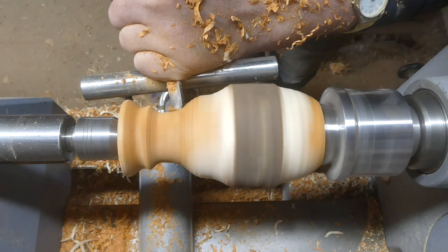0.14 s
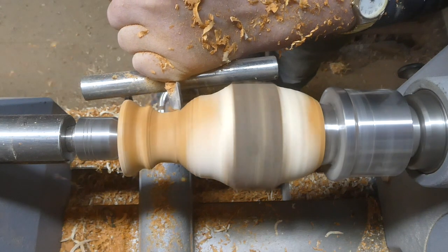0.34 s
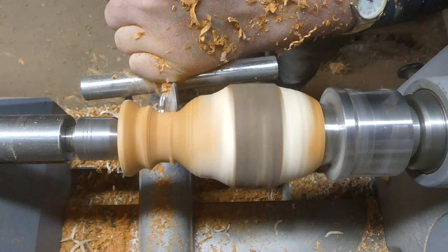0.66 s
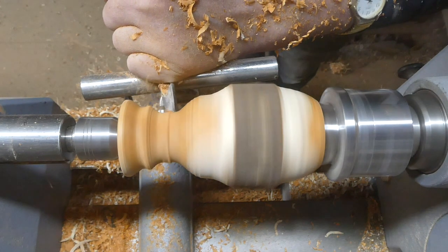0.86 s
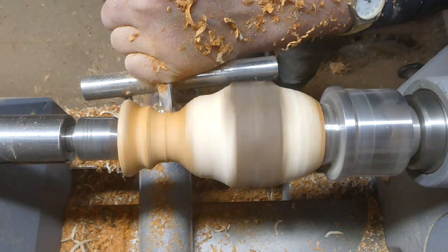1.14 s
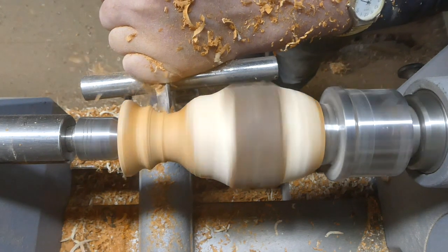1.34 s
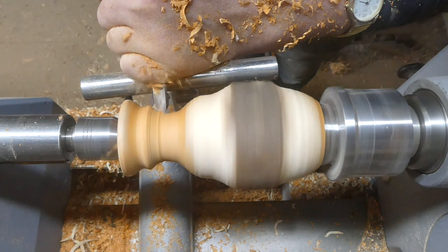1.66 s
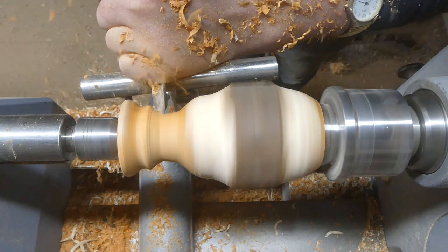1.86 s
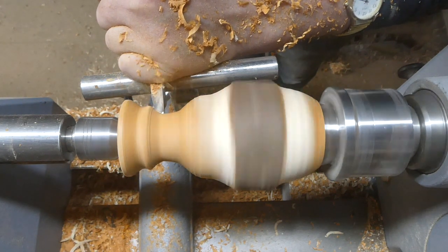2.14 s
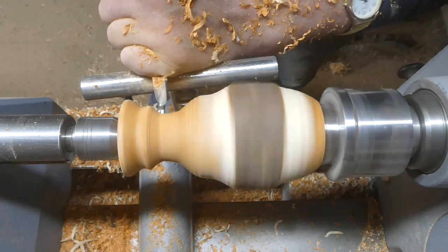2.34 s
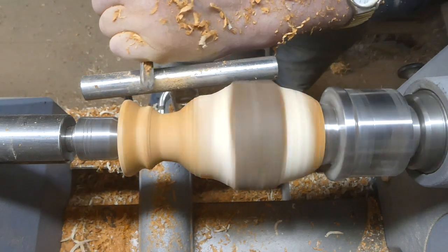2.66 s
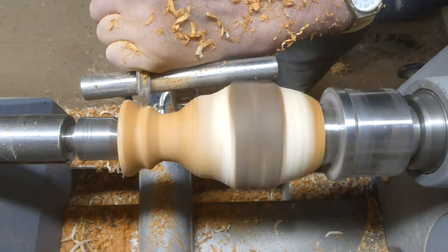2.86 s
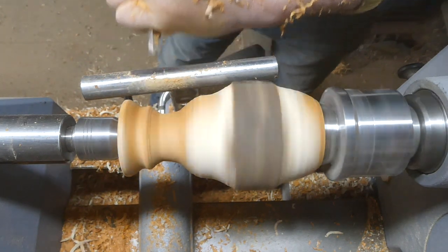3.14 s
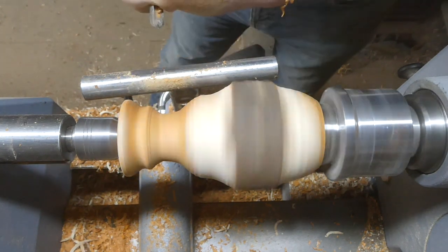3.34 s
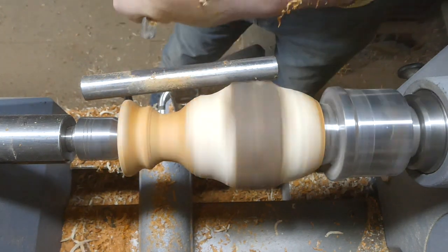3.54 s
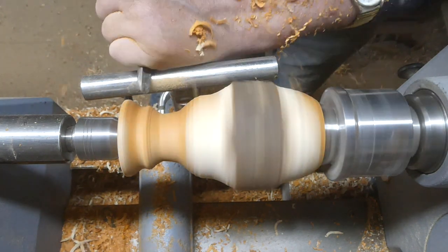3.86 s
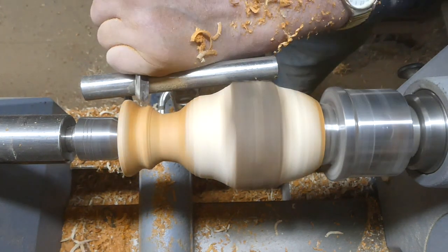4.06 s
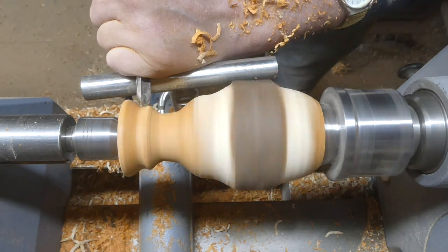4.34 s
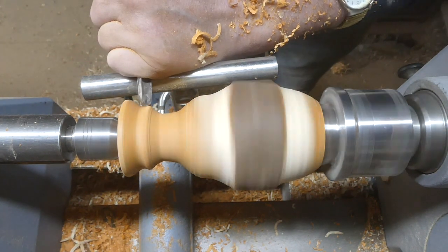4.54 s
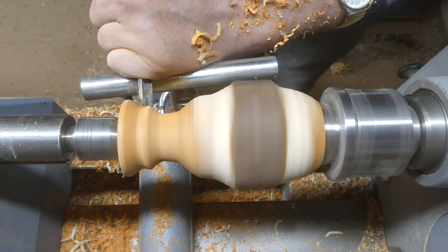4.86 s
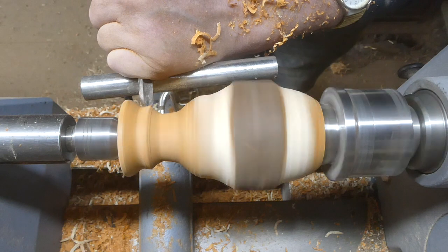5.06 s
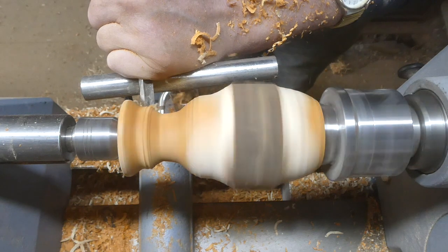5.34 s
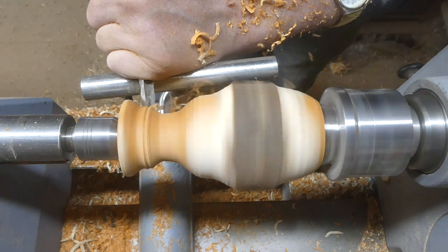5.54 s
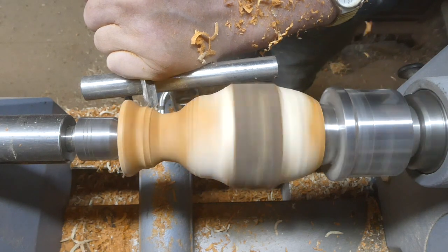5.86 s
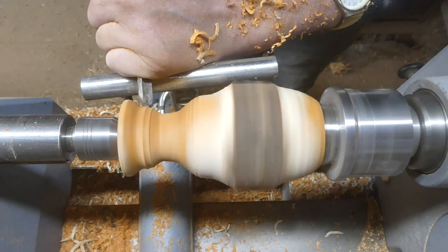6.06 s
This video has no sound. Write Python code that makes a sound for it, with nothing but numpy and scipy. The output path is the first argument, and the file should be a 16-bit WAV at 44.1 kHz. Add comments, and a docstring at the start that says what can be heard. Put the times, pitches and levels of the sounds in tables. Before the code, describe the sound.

A gouge scrapes spinning wood in a loud, crackling, fluttering rush, pauses over a humming lathe with small metal clicks, then cuts again briefly.

```python
"""Gouge on a lathe

A gouge cuts a wooden vase in two close passes; tearing fibres excite wood and tool, pulsing with the grain.
Chips snap, the rubbing bevel sings, and a thin squeal rides on the first pass.
Filtered noise makes the lathe's drone and hiss, sines the motor and its whine; room tails widen the sound.
Between passes shavings are brushed off the hand and the tool clicks on its rest: shaped and ringing noise.
"""
import sys
import numpy as np
from scipy import signal
from scipy.fft import rfft, irfft
from scipy.io import wavfile
from scipy.ndimage import uniform_filter1d

SR = 44100
rng = np.random.default_rng(int(sys.argv[2]) if len(sys.argv) > 2 else 0)


def persist_wave(psi):
    """Save psi, clipped to +-1, as 16-bit WAV."""
    counts = np.round(np.clip(psi, -1, 1) * 32767).astype(np.int16)
    wavfile.write(sys.argv[1], SR, np.atleast_2d(counts).T)


N = 273420
TIME = np.arange(N) / SR
HZ = np.fft.rfftfreq(8192, 1 / SR)

TURNS_PER_S = 15.4
DEEPEN_DB_PER_S = 2.0  # the lows gain on the rest as the gouge sinks in
SNAP_CHANCE, SNAP_S, SNAP_JITTER_S = 0.8, 0.0015, 0.014  # small chips at the hard spots
SNAP_MAX_OVER_FORCE_DB, SNAP_SPREAD_DB = 13.5, 6.5
DIP_FALL_S, DIP_RETURN_DB_PER_S = 0.18, 5
SQUEAL_HZ, SWITCH_HZ, MOTOR_HZ = 1143, 10000, 31.67
SAG_SHARE, FULL_FORCE_DB = 0.025, -43  # motor slowing at full cutting force
EDGE_HZ = 15850

# the two passes: (time [s], cutting force [dB], treble level [dB], top fizz level [dB])
FIRST_PASS = [(0, -50, -41, -43.5), (0.19, -48.5, -40, -48.5), (0.3, -51.5, -46, -53),
              (0.37, -45, -44, -51.5), (0.5, -43, -42, -50.5), (0.9, -43, -44.5, -48.5),
              (1.15, -42.5, -43.5, -47), (1.66, -43.5, -45, -48), (2.1, -56, -52, -49),
              (2.19, -70.5, -72, -65)]
SECOND_PASS = [(4.58, -67, -54, -71), (4.62, -55.5, -51.5, -57), (4.815, -57, -58, -55),
               (4.836, -44, -43, -45.5), (5.08, -45.5, -46.5, -47.5), (5.35, -43.5, -41.5, -45.5),
               (5.64, -47.5, -39.5, -46.5), (5.71, -47, -44, -46.5), (5.78, -52.5, -47.5, -51.5),
               (5.83, -53.5, -59, -52), (5.88, -69, -76, -63)]
# hard spots of the grain: (place [turns], half-width to 1/e [turns], hardness [dB])
FIRST_GRAIN = [(.33, 0.19, 3), (0.569, 0.15, 2.5), (.8, 0.1, 3.5)]
SECOND_GRAIN = [(0.101, 0.2, 2.1), (.44, 0.15, 4.8), (.9, 0.059, 5.5)]
# broad colour of the cutting: (frequency [Hz], first pass [dB], second pass [dB])
WOOD_COLOUR = [(120, -33, -25), (190, -22, -12), (256, -13.5, -12), (577, -3.5, -5.5), (975, -5, -3.5),
               (1600, -9, -21.5), (2510, -10, -26), (3300, -16.5, -19), (5000, -1.5, -10.5),
               (7300, -12, -3.5), (8900, -11, 1.5), (11730, -18, -11), (14300, -23, -13), (15500, -17, -18)]
# workpiece, gouge and rest resonances: (frequency [Hz], width [Hz], first height [dB], second height [dB])
CUTTING_MODES = [(259, 58, 13.5, 18.5), (374.5, 28, 8, 15.5), (473, 190, 6, 10.5), (628, 38, 5, 11),
                 (744, 57, 4, 7), (784.7, 42, 12.5, 14), (953, 16, 8.5, 8), (1067, 21, 4, 13),
                 (1160, 18, 7.5, 13), (1281, 70, 12, 10), (1421, 117, 13, 14), (1504, 23, 15, 12.5),
                 (1587, 40, -1.5, 16), (1795, 480, 16.5, 15.5), (2097, 860, 1, 18), (2493, 42, 10, 11),
                 (2722, 300, 11.5, 10.5), (3032, 96, 13.5, 7), (3243, 74, 11, 17.5),
                 (3527, 570, 12.5, 17.5), (3832, 36, 7.5, 14.5), (4604, 810, 5, 17), (5390, 120, -5.5, 5),
                 (9470, 210, 9, -1), (10470, 1500, 4.5, 7), (15200, 1065, -5.5, 5)]
# the gouge's ring when a chip snaps: (frequency [Hz], width [Hz], first height [dB], second height [dB])
GOUGE_MODES = [(1990, 380, -6, 9), (2520, 77, -4, -20), (3370, 230, -2, 8.5), (5100, 850, 8, -5)]
# the edge catches and snaps off a big chip: (time [s], peak [dB], length [s])
BIG_CATCHES = [(0.144, -28, 0.0027), (0.196, -26, 0.0027), (0.2015, -20, 0.0025), (0.212, -23, 0.0019),
               (0.22, -24, 0.0032), (0.2302, -24, 0.0011), (0.251, -21, 0.0022), (0.263, -22.5, 0.0066),
               (0.284, -26, 0.0033), (0.329, -28, 0.0017), (0.3365, -32, .002), (0.343, -26.5, 0.004),
               (0.349, -26, 0.0011), (0.372, -27, 0.0025), (0.408, -27.5, 0.0034), (0.437, -36, 0.0027),
               (0.472, -26.5, 0.0027), (0.487, -28.5, .0025), (0.504, -26, 0.0034), (0.533, -25, 0.00091),
               (0.539, -20.5, 0.0043), (0.569, -27, .003), (0.6015, -24.5, 0.0037), (0.605, -24, 0.0029),
               (0.6645, -22.5, 0.0036), (0.683, -34, .0015), (0.697, -26, 0.0033), (0.7265, -25, 0.003),
               (0.732, -22.5, 0.0035), (0.7917, -24, 0.0011), (0.802, -30, 0.0012), (0.864, -31, 0.0016),
               (0.956, -28.5, 0.0017), (0.994, -33, 0.0017), (1.008, -22.5, 0.0014), (1.0595, -23, 0.00099),
               (1.079, -23.5, 0.004), (1.092, -21.5, 0.00058), (1.14, -27, .0015), (1.189, -26, 0.0032),
               (1.218, -28.5, 0.0022), (1.312, -26.5, 0.0014), (1.3195, -32, 0.0008), (1.349, -26, 0.0032),
               (1.383, -29, 0.0018), (1.3975, -25, 0.00067), (1.422, -27, 0.001), (1.4505, -25, 0.0021),
               (1.468, -32, .0015), (1.542, -28, .003), (1.638, -34, 0.0016), (1.709, -27, .0015),
               (1.722, -24, 0.0056), (1.74, -26.5, 0.00099), (1.776, -25, 0.0013), (4.834, -30, .002),
               (4.86, -18, 0.0023), (4.876, -26, .004), (4.8915, -24.5, 0.0061), (4.926, -22.5, 0.0038),
               (4.96, -31, 0.0057), (4.993, -29, 0.0072), (5.0558, -25, 0.0015), (5.119, -23.5, 0.0043),
               (5.152, -32, 0.0037), (5.1855, -28.5, 0.004), (5.221, -35, 0.0064), (5.247, -26, 0.0033),
               (5.315, -28.5, 0.0024), (5.354, -27.5, 0.0027), (5.483, -28, 0.0022), (5.557, -30, 0.0017),
               (5.639, -26.5, 0.0021)]
# the rubbing bevel feeds one resonance: (start [s], end [s], frequency [Hz], width [Hz], level [dB])
SINGING_BURSTS = [(0.0223, 0.072, 2700, 110, -39), (0.1, 0.18, 2750, 150, -44),
                  (0.163, 0.243, 2700, 220, -40), (0.23, 0.292, 2560, 200, -40),
                  (0.318, 0.37, 2610, 150, -41), (0.398, 0.436, 2740, 78, -41.5),
                  (0.45, 0.56, 2700, 140, -48), (0.008, 0.092, 4960, 420, -37.5),
                  (0.097, 0.315, 5070, 510, -40.5), (0.015, 0.23, 1660, 200, -54),
                  (0.224, 0.337, 1500, 170, -43), (0.15, 0.24, 1700, 800, -44), (.46, .56, 1780, 290, -43),
                  (.49, 0.51, 370, 240, -43), (.01, 0.71, 265, 26, -57), (0.418, 0.81, 1380, 250, -45.5),
                  (0.29, 1.15, 4900, 470, -52.5), (1.15, 1.85, 5010, 370, -50.5),
                  (0.92, 0.985, 800, 72, -45), (1.5, 1.72, 420, 94, -51.5), (1.85, 2.14, 9000, 460, -59),
                  (4.59, 4.675, 1540, 160, -46), (4.675, 4.85, 1540, 150, -49.5),
                  (4.59, 4.78, 3200, 200, -55), (4.81, 5.72, 3365, 190, -49), (4.86, 5.05, 770, 59, -45),
                  (5.1, 5.5, 763, 99, -51), (5.44, 5.73, 3440, 600, -43.5)]
# thin squeal of the first pass: (time [s], level [dB])
SQUEAL_LEVEL = [(0.35, -72), (0.372, -50.5), (0.61, -53.5), (0.635, -50), (0.74, -46), (0.99, -54),
                (1.04, -72)]
# tool touching the rest: (time [s], rms over the first 10 ms of the crack [dB], brightest band [Hz],
# its width [Hz], its height [dB], top edge [Hz], steel ring re crack [dB], knock of the rest [dB])
TOOL_CLICKS = [(3.002, -54, 6840, 1800, 7, 7500, -14, -44.5), (3.2366, -41, 6900, 1700, 12, 7500, -17, -42),
               (3.6244, -42, 3430, 1200, 14, 6500, -19, -42), (3.86, -33, 3750, 1700, 14, 9500, 2.5, -45)]
# broad tool rest resonances: (frequency [Hz], width [Hz], height [dB])
REST_MODES = [(1700, 480, 7.5), (2680, 340, -11), (3180, 290, 12.5), (4450, 450, 8), (5240, 430, -5),
              (6200, 510, 8), (8650, 1700, 5)]
# thin ring of the steel: (frequency [Hz], relative level [dB], t60 [s])
STEEL_RING = [(3300, -12, 0.14), (4430, -14, .03), (6400, -17.5, .04), (9790, -4.5, 0.12), (11400, -6, .05)]
# knock of the rest and its post: (frequency [Hz], relative level [dB], t60 [s])
REST_KNOCK = [(275, -7.5, .08), (1600, -3.5, 0.053), (1880, -13, 0.037), (2370, -6, .03)]
# shavings brushed off the hand: (time [s], level [dB])
BRUSHING_LEVEL = [(2.8, -66), (3.15, -60), (3.3, -58), (3.42, -54.5), (3.48, -55.5), (3.53, -50),
                  (3.65, -49.5), (3.73, -56), (3.83, -54), (3.95, -65)]
# colour of the shavings: (frequency [Hz], relative level [dB])
SHAVINGS_COLOUR = [(300, -57), (950, 9.5), (1400, 27), (1900, 20), (2500, 18), (3300, 17.5), (7000, 7.5),
                   (10000, -1), (15000, -1)]
# colour of the running lathe: (frequency [Hz], relative level [dB])
LATHE_COLOUR = [(120, 2.5), (200, -9), (270, 4), (420, -5), (700, -12.5), (1400, -7), (2500, -6.5),
                (4000, -14), (7000, -15.5), (9500, -21), (12000, -24), (15500, -29.5)]
# headstock resonances: (frequency [Hz], width [Hz], height [dB])
HOUSING_MODES = [(297, 9.3, 3.5), (364, 50, 3.5), (480, 45, 4.5), (572, 110, 3), (752, 140, 6),
                 (1071, 37, 8.5), (1194, 18, 9), (1314, 58, 12), (1530, 170, 4.5), (2033, 23, 12),
                 (2916, 59, 8), (3140, 120, 10.5), (4000, 430, 6), (9970, 2000, 14)]
# set times when the running noise is heard more faintly: (start [s], end [s], depth [dB])
RUNNING_NOISE_DIPS = [(.17, 2.22, 9.5), (3.75, 4.18, 1), (5.099, 5.7, 3)]
# motor tones: (unloaded frequency [Hz], relative level [dB])
MOTOR_TONES = [(338, -57.3), (506.0, -70), (555, -70), (570.6, -61.5), (1071, -67), (1200, -73),
               (1298, -70), (1314, -68), (1384, -71), (1577, -71), (2030, -75)]
# sidebands of the drive's switching tone: (offset [multiples of MOTOR_HZ], relative level [dB])
WHINE_SIDEBANDS = [(-21, -79), (-15, -77), (-13, -78), (-5, -69.5), (-3, -65), (-1, -66.5), (1, -73),
                   (3, -70), (5, -71), (15, -71), (17, -80), (21, -81)]
# mains hum: (frequency [Hz], level [dB])
MAINS_HUM = [(49.7, -74), (99.8, -69.5)]
# colour of the workshop rumble: (frequency [Hz], relative level [dB])
RUMBLE_COLOUR = [(12, -2), (25, -13), (42, 8), (60, 3.5), (80, -0.5), (130, -3), (200, 3), (500, -59)]
# diffuse room tail: (frequency [Hz], relative level [dB], t60 [s])
ROOM_TAIL = [(50, -3.5, 0.52), (130, -29, 0.098), (300, -10, 0.2), (795, -9.5, 0.17), (4900, -12.5, 0.072),
             (8040, -11, 0.073), (15000, -3.5, 0.13)]


def cut(rows, grain, body_db, depth_db, grain_low=0.23, grain_high=0.76, grain_chips=0.98,
        flutter_db=0.5, unsteady_db=1.0, crackle_db=-4):
    """One pass: fibres tear harder in hard grain and ring wood and tool; the lows grow with depth."""
    force_db, treble_db, fizz_db = curves(rows)
    start_s, end_s = rows[0][0], rows[-1][0]
    lows_db = force_db + depth_db + DEEPEN_DB_PER_S * np.clip(TIME - start_s, 0, end_s - start_s)
    touching = uniform_filter1d(1. * ((TIME >= start_s) & (TIME <= end_s)), size=400)
    hand = gain_of(unsteady_db * wander(18.5))  # uneven feed
    flutter = flutter_db * wander(100)  # the shaving curls and breaks unevenly
    hard_db = hardness(grain)

    tearing = fibres(per_s=3000, spread_db=3.0, rub=0.62)
    push = tearing * gain_of(grain_low * hard_db + 0.6 * flutter)
    crackle = gain_of(crackle_db) * fibres(per_s=260, spread_db=2.5, rub=0)  # single splinters
    scrape = (tearing + crackle) * gain_of(grain_high * hard_db + flutter)
    fine = fibres(per_s=6000, spread_db=1.5, rub=0.96)
    chips = (fine + 0.53 * crackle) * gain_of(grain_chips * hard_db + 1.2 * flutter)

    layers = [(push, lows_db, band(150, 1000)), (push, force_db, band(1000, 2300)),
              (scrape, treble_db, band(2300, 6500)), (chips, fizz_db, band(6500, 20000))]
    total = sum(gain_of(db) * evened(colour(x, body_db + part_db)) for x, db, part_db in layers)
    return touching * hand * total


def hardness(grain):
    """The grain passing under the edge, turn after turn, in dB."""
    turns = TIME * TURNS_PER_S
    total_db = np.zeros(N)
    for place, width, db in grain:
        offset = (turns - place + 0.5) % 1 - 0.5
        total_db += db * np.exp(-(offset / width) ** 2)
    return total_db


def fibres(per_s, spread_db, rub):
    """Snapping fibres of uneven size over the smooth rub of the bevel."""
    size = gain_of(spread_db * np.minimum(rng.exponential(1, N), 4))
    snaps = size * rng.choice([-1, 1], N) * (rng.random(N) < per_s / SR)
    return evened(evened(snaps) + rub * rng.standard_normal(N))


def catches(rows, grain, body_db, low_hz, top_hz):
    """Chips snap off: crunches of milliseconds into the body and gouge resonances."""
    out, t = np.zeros(N), np.arange(2048) / SR
    ring_db = body_db + band(low_hz, top_hz, order=4)
    for s, peak_db, length_s in BIG_CATCHES + small_catches(rows, grain):
        if max(rows[0][0], 0) <= s <= rows[-1][0]:
            u = 2 * t / length_s
            burst = rng.standard_normal(len(t)) * u * np.exp(-u ** 2 / 2)
            crunch = colour(burst, ring_db)
            add(out, s, gain_of(peak_db) * crunch / abs(crunch).max())
    return out


def small_catches(rows, grain):
    """Each passing hard spot may snap off a small chip, louder under more force: (s, dB, s)."""
    s, force_db = np.transpose(rows)[:2]
    turns = range(int(TIME[-1] * TURNS_PER_S))
    times = np.array([(turn + spot[0]) / TURNS_PER_S for turn in turns for spot in grain])
    luck, size, shift = rng.random((len(times), 3)).T
    peaks_db = np.interp(times, s, force_db) + SNAP_MAX_OVER_FORCE_DB - SNAP_SPREAD_DB * size
    times = times - SNAP_S + SNAP_JITTER_S * (shift - 0.5)
    snapped = luck < SNAP_CHANCE
    return [(at, db, SNAP_S) for at, db in zip(times[snapped], peaks_db[snapped])]


def singing(grain_share=1.0, flutter_db=1.6, fade_s=0.021, steady=0.46):
    """Rubbing feeds single resonances in bursts; friction evens their swing, the grain throbs them."""
    out = np.zeros(N)
    flutter = flutter_db * wander(74)
    grips = [gain_of(grain_share * hardness(grain) + flutter) for grain in (FIRST_GRAIN, SECOND_GRAIN)]
    for start_s, end_s, hz, width_hz, db in SINGING_BURSTS:
        span = (TIME >= start_s) & (TIME < end_s)
        t = TIME[span]
        resonance_db = -20 * np.log10(1 + ((HZ - hz) / width_hz * 1.3) ** 2)
        ring = evened(colour(rng.standard_normal(len(t)), resonance_db))
        ring = ring / (abs(signal.hilbert(ring)) + 0.1) ** steady  # partly flattens the envelope
        held = np.clip(np.minimum(t - start_s, end_s - t) / fade_s, 0, 1)
        grip = grips[int(start_s > FIRST_PASS[-1][0])][span]
        out[span] += gain_of(db) * held * evened(ring * grip)
    return out


def squeal(waver_db=1.0, drift_hz=1.96):
    """The bevel sticks and slips on one workpiece mode: a thin note inside the scraping."""
    sounding = (TIME > SQUEAL_LEVEL[0][0]) & (TIME < SQUEAL_LEVEL[-1][0])
    note = tones([(SQUEAL_HZ, 0)], waver_db, drift_hz)
    return sounding * gain_of(curves(SQUEAL_LEVEL)[0]) * note


def clicks(crack_s=0.0016, bounce_s=0.0047, bounce_db=-8):
    """Steel meets steel: a crack and bounce through rest resonances, a thin ring and a dull knock."""
    out, t = np.zeros(N), np.arange(8192) / SR
    for s, db, hz, width_hz, height_db, top_hz, ring_db, knock_db in TOOL_CLICKS:
        contact = np.exp(-t / crack_s)
        contact += gain_of(bounce_db) * (t > bounce_s) * np.exp(-abs(t - bounce_s) / 0.0023)
        contact += gain_of(-21) * np.exp(-t / 0.02)  # the rest shivers on
        steel_db = peaks([(hz, width_hz, height_db)] + REST_MODES) + band(250, top_hz, order=6)
        crack = colour(contact * rng.standard_normal(len(t)), steel_db)
        crack = crack / crack[t < 0.01].std()
        add(out, s, gain_of(db) * (crack + gain_of(ring_db) * ringing(STEEL_RING, t)))
        add(out, s, gain_of(knock_db) * ringing(REST_KNOCK, t))
    return out


def ringing(modes, t):
    """Struck modes, each dying at its own speed."""
    return sum(gain_of(db - 60 * t / t60_s) * np.sin(2 * np.pi * hz * t) for hz, db, t60_s in modes)


def brushing():
    """Dry shavings rustle off the hand: sparse snaps over noise, coloured."""
    rustle = colour(fibres(per_s=2700, spread_db=-1, rub=0.69), read(SHAVINGS_COLOUR))
    return gain_of(curves(BRUSHING_LEVEL)[0]) * evened(rustle)


def lathe(drone_db=-49.5, hiss_db=-51.5, drone_share=0.88, hiss_share=0.94, throb_db=0.5):
    """Bearings and belt rumble and hiss through the housing; the drone throbs twice a turn."""
    housing_db = read(LATHE_COLOUR) + peaks(HOUSING_MODES)
    throb = gain_of(throb_db * np.sin(2 * np.pi * 2 * TURNS_PER_S * TIME))
    drone_noise = rng.standard_normal(N) * throb
    drone = evened(colour(drone_noise, housing_db + band(170, 2670, order=6)))
    hiss_noise = fibres(per_s=5000, spread_db=2.5, rub=1.0)
    hiss = evened(colour(hiss_noise, housing_db + band(4200, 20000, order=6)))
    dip_db = running_noise_dip_db()
    return gain_of(drone_db + drone_share * dip_db) * drone + gain_of(hiss_db + hiss_share * dip_db) * hiss


def running_noise_dip_db():
    """Level change heard in the running noise: at set times it fades down, then rises back steadily."""
    dip_db = np.zeros(N)
    for start_s, end_s, depth_db in RUNNING_NOISE_DIPS:
        fall = np.clip((TIME - start_s) / DIP_FALL_S, 0, 1)
        dip_db -= fall * np.clip(depth_db - DIP_RETURN_DB_PER_S * (TIME - end_s), 0, depth_db)
    return dip_db


def motor(motor_db=2.0, whine_db=2.5):
    """Motor tones that sag under load, the drive's high whine and mains hum, all from sines."""
    sidebands = [(SWITCH_HZ + k * MOTOR_HZ, db) for k, db in WHINE_SIDEBANDS]
    whine = gain_of(whine_db) * tones(sidebands, waver_db=4.0, drift_hz=0.67)
    turning = gain_of(motor_db) * tones(MOTOR_TONES, waver_db=0.0, drift_hz=0.27, clock=motor_time())
    hum = tones(MAINS_HUM, waver_db=2, drift_hz=0.27)
    return gain_of(running_noise_dip_db()) * (turning + whine) + hum


def motor_time():
    """The motor's own clock in s, which falls behind while the gouge loads it."""
    load = np.zeros(N)
    for rows in (FIRST_PASS, SECOND_PASS):
        cutting = (TIME > rows[0][0]) & (TIME < rows[-1][0])
        load += cutting * gain_of(curves(rows)[0] - FULL_FORCE_DB)
    return TIME - SAG_SHARE * np.cumsum(load) / SR


def tones(lines, waver_db, drift_hz, clock=TIME):
    """Sines that waver in level and drift in pitch (both rms)."""
    out = np.zeros(N)
    for hz, db in lines:
        level = gain_of(db + waver_db * wander(7.0))
        cycles = hz * clock + drift_hz * np.cumsum(wander(3.5)) / SR + rng.random()
        out += level * np.sqrt(2) * np.sin(2 * np.pi * cycles)
    return out


def rumble(level_db=-67, apart=0.23):
    """Low workshop rumble: coloured noise, nearly the same in both channels."""
    common, side = (evened(colour(noise, read(RUMBLE_COLOUR))) for noise in rng.standard_normal((2, N)))
    return gain_of(level_db) * (common + apart * np.array([side, -side]))


def workshop(x, ahead_db=-8):
    """Two diffuse tails: a weak one from ahead, and one from the sides that parts the channels."""
    hz, t, z = signal.stft(rng.standard_normal((2, SR // 2)), SR, nperseg=256)
    level = gain_of(read(ROOM_TAIL, hz))
    z = z * gain_of(-60 * t / read(ROOM_TAIL, hz, axis=2)[:, None])
    z *= (1 + 2.2 * np.exp(-t / 0.049)) * (t > 0)  # early reflections off the lathe bed
    z *= (level / np.sqrt((abs(z) ** 2).sum(2)))[..., None]
    tail = signal.istft(z, SR, nperseg=256)[1]
    tail *= np.sqrt(np.mean(level ** 2) / (tail ** 2).sum(1, keepdims=True))
    ahead, side = signal.fftconvolve(x[None], tail, axes=1)[:, :N]
    return x + gain_of(ahead_db) * ahead + np.array([side, -side])


def gain_of(db):
    """Decibels to a factor."""
    return 10 ** (np.asarray(db) / 20)


def evened(x):
    """Scaled to rms 1."""
    return x / np.sqrt(np.mean(x ** 2) + 1e-20)


def read(points, hz=HZ, axis=1):
    """One column of a spectrum table, joined on a log-frequency axis."""
    table = np.transpose(points)
    return np.interp(np.log(hz + 1), np.log(table[0] + 1), table[axis])


def curves(rows):
    """Each column of a time table at every sample."""
    s, *columns = np.transpose(rows)
    return [np.interp(TIME, s, c) for c in columns]


def add(mix, s, sound):
    """Lays a sound into the mix at time s."""
    part = mix[round(s * SR):][:len(sound)]
    part += sound[:len(part)]


def peaks(modes, axis=2):
    """The dB that a set of resonances adds to a spectrum."""
    return sum(m[axis] / (1 + (2 * (HZ - m[0]) / m[1]) ** 2) for m in modes)


def band(lo_hz, hi_hz, order=16):
    """Band-pass in dB, steeper with order."""
    return -10 * np.log10((1 + (lo_hz / (HZ + 1)) ** order) * (1 + (HZ / hi_hz) ** order))


def colour(x, db):
    """Minimum-phase filter, its highest gain at 0 dB: resonances ring after each blow."""
    cepstrum = irfft(np.maximum(db - db.max(), -100) * np.log(10) / 20)
    half = len(cepstrum) // 2
    cepstrum[1:half] *= 2  # folding the cepstrum makes the response causal
    cepstrum[half + 1:] = 0
    response = irfft(np.exp(rfft(cepstrum)))[:half]
    return signal.oaconvolve(x, response)[:len(x)]


def wander(rate_hz):
    """Slow random drift of rms 1: Gaussian low-passed noise."""
    hz = np.fft.rfftfreq(N, 1 / SR)
    return evened(irfft(rfft(rng.standard_normal(N)) * np.exp(-(hz / rate_hz) ** 2), N))


def scene():
    """Both passes, lathe and handling in the workshop; motor and rumble added without the tails."""
    first_db = read(WOOD_COLOUR, axis=1) + peaks(CUTTING_MODES, axis=2)
    second_db = read(WOOD_COLOUR, axis=2) + peaks(CUTTING_MODES, axis=3)
    first_snap_db = first_db + peaks(GOUGE_MODES, axis=2)
    second_snap_db = second_db + peaks(GOUGE_MODES, axis=3)
    first = cut(FIRST_PASS, FIRST_GRAIN, first_db, depth_db=-3.0)
    first += catches(FIRST_PASS, FIRST_GRAIN, first_snap_db, low_hz=3400, top_hz=13100)
    second = cut(SECOND_PASS, SECOND_GRAIN, second_db, depth_db=0.5, grain_low=0.2, grain_high=0.7,
                 flutter_db=1.0, crackle_db=-6.5)
    second += catches(SECOND_PASS, SECOND_GRAIN, second_snap_db, low_hz=1400, top_hz=5200)
    near = workshop(first + second + singing() + squeal() + clicks() + brushing() + lathe())
    return (near + motor() + rumble()) * gain_of([[-0.3], [0.3]])  # slightly louder on the right


def record(dry):
    """Steep low-pass at EDGE_HZ."""
    lowpass = signal.firwin(511, EDGE_HZ, window=("kaiser", 9), fs=SR)
    return signal.oaconvolve(dry, lowpass[None], "same")


dry = scene()
out = record(dry)
persist_wave(out)
```